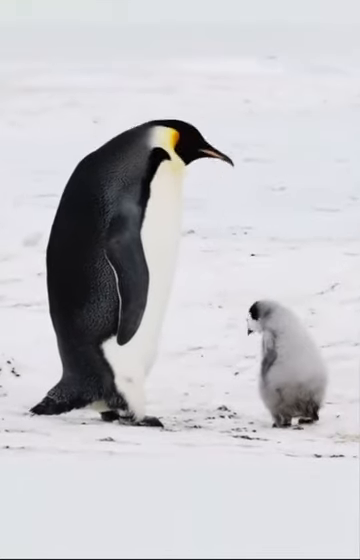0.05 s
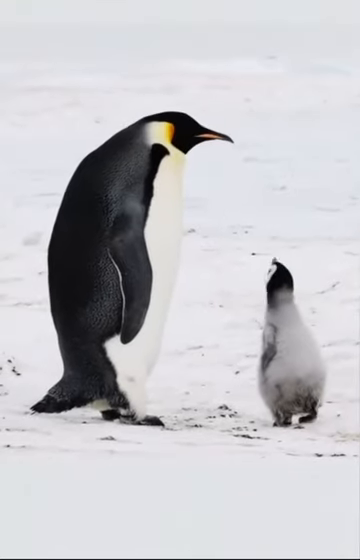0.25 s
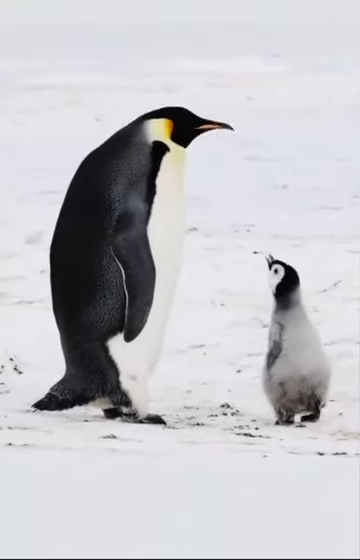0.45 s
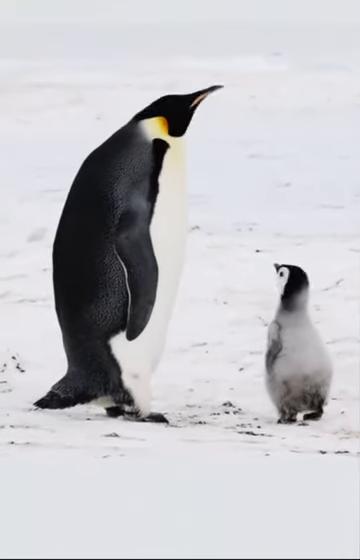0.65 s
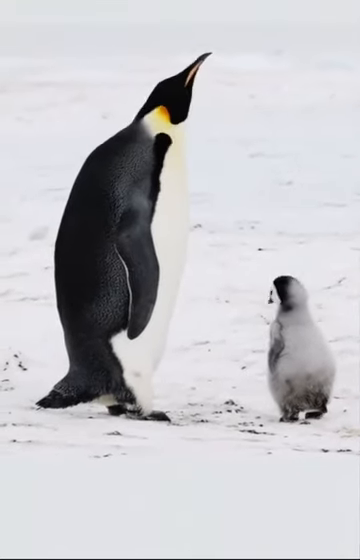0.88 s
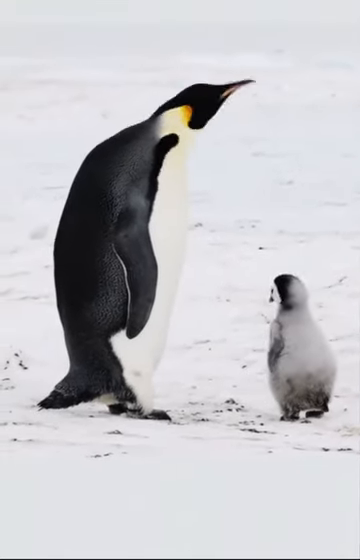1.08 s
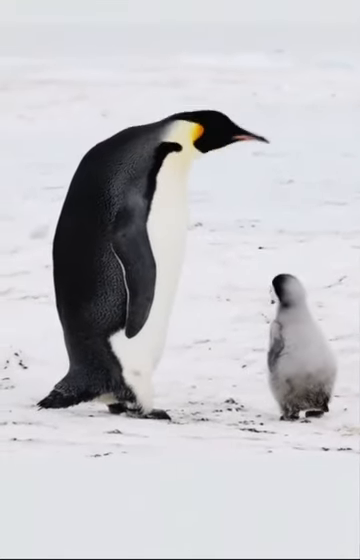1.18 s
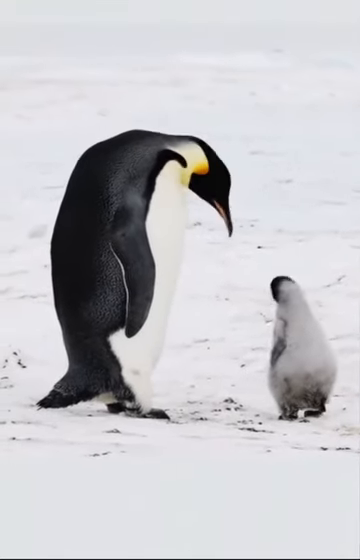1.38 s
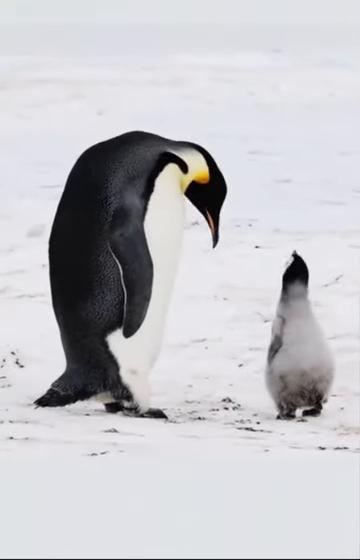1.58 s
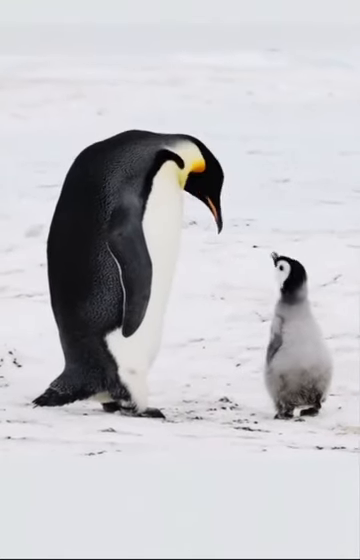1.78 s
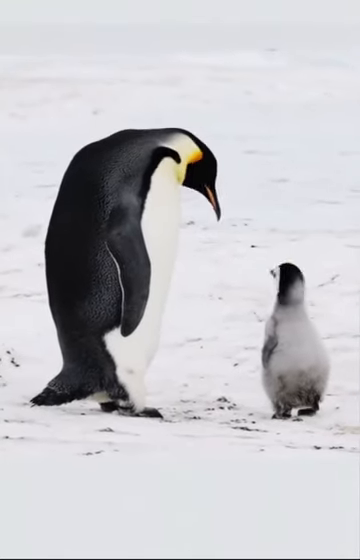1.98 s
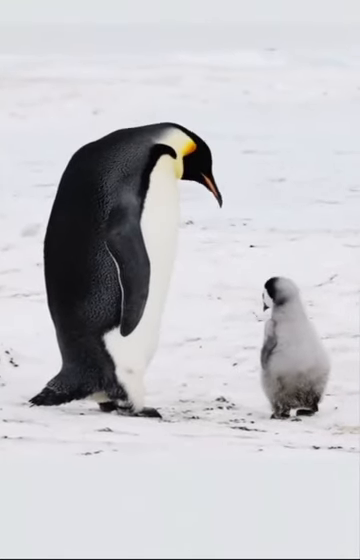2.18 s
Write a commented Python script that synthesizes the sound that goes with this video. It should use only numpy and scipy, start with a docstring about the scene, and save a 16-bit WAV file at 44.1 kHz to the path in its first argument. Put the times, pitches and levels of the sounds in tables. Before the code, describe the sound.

A penguin chick whistles two high begging phrases over soft wind.

```python
"""An emperor penguin chick begs twice on open snow: short whistles, then a long slurred one.
Each note is a near-sine with weak overtones shaped by the throat, thin and hoarse where it flicks high.
Behind it: a soft steady wind with low buffets, a few dull bumps, and a distant colony of
whistling chicks and braying adults."""
import sys
import numpy as np
from scipy import signal
from scipy.fft import rfft, irfft
from scipy.io import wavfile
from scipy.ndimage import uniform_filter1d

SR = 44100
rng = np.random.default_rng(int(sys.argv[2]) if len(sys.argv) > 2 else 0)


def inscribe(sig):
    """Save sig as 16-bit PCM at rate SR to the path in sys.argv[1].

    A 1-D sig is mono; a 2-D sig holds one channel per row.
    Samples are clipped to [-1, 1] before scaling.
    """
    pcm = np.round(np.clip(np.atleast_2d(sig).T, -1, 1) * 32767)
    wavfile.write(sys.argv[1], SR, pcm.astype(np.int16))


N = 99225

# Noise spectra: freq_hz, density_db
WIND_COLOUR = [(15, -40), (30, -21.5), (60, -16.5), (100, -9.5), (170, -8), (310, -11), (450, -4.5),
               (700, -8), (1100, -3), (1500, -0.5), (1900, -1.5), (2250, -15), (3000, -17), (4000, -18),
               (5000, -26), (6000, -30.5), (7200, -37.5), (13000, -40.5)]
BUFFET_COLOUR = [(20, -16), (50, -7), (90, 0.5), (170, 0.5), (300, -16), (1000, -52)]
BUMP_COLOUR = [(40, -18), (120, -9), (230, 10.5), (380, 1), (560, 3.5), (900, -9), (3000, -45.5)]
RASP_COLOUR = [(500, -32.5), (1500, -4.5), (2500, 1.5), (3800, -0.5), (4800, -7), (5900, 0.5),
               (7000, -14.5), (8300, -7.5), (10500, -21), (13000, -21.5)]
# Wind strength: time_s, level_db
WIND_LEVEL = [(0, -43.5), (.35, -44), (.8, -43), (1.35, -45.5), (1.85, -42), (2.05, -47), (2.25, -45)]
# Wind buffets and dull bumps: centre_s, level_db, half_length_s
BUFFETS = [(0.047, -56.5, 0.025), (0.712, -55.5, 0.063), (0.831, -53.5, .025), (2.163, -50.5, 0.017)]
BUMPS = [(1.018, -46.5, 0.013), (1.245, -44.5, 0.013), (1.468, -45.5, 0.023), (1.861, -51, 0.014)]
# Nearer chicks in the colony: centre_s, top_hz, level_db, length_s
COLONY_CALLS = [(.02, 1810, -51, .1), (.81, 2026, -53, .08), (.94, 2000, -48, .11), (.98, 2490, -55, .05),
                (1.05, 1982, -52, .09), (1.24, 1896, -46, .07), (1.33, 1940, -47, .08),
                (1.43, 1902, -51, .06), (2.19, 1760, -50, .09)]
# Voice colour of the adults; throat and beak of the chick: freq_hz, gain_db
ADULT_COLOUR = [(400, -3), (800, -1), (1300, -4.5), (1800, -3), (2300, -13), (3500, -16.5)]
THROAT_COLOUR = [(2500, -19.5), (3200, -23), (3750, -16.5), (4200, -26.5), (4600, -35), (5100, -30.5),
                 (5800, -15), (6300, -22), (7000, -36), (8300, -24.5), (10000, -33.5), (13000, -38.5)]
# Chick overtones ahead of the throat: harmonic, level_db
OVERTONES = [(2, 0.5), (3, -16.5), (4, -28), (5, -33.5)]
# Whistle contours: time_s, pitch_hz, level_db, overtone_db
OPENING_PEEP = [(0.124, 2080, -37.5, 12), (0.1295, 1810, -26.5, -8), (0.1459, 1893, -27, -3),
                (0.1519, 1930, -32, 6.5)]
FIRST_SHORT = [(0.191, 2879, -66.8, 3), (0.1947, 2765, -36.5, -11.5), (0.204, 1925, -20, 6),
               (0.219, 1795, -20, 8.5), (0.2316, 1968, -18, 4), (0.2386, 2610, -34.5, -6),
               (0.2449, 3090, -36.5, -0.5), (0.2547, 2830, -50, 11)]
FIRST_MIDDLE = [(0.309, 3363, -45, -9), (0.314, 3070, -32, -23.5), (0.323, 2187, -16.7, -14),
                (0.331, 1955, -12.7, 2), (0.3601, 1747, -14.5, -3), (0.38, 1652, -17.5, -9.5),
                (0.394, 1795, -14, 1.5), (0.4044, 1983, -12.8, -2), (0.41, 2596, -29.9, -4),
                (0.4174, 2907, -33.5, 9.5), (0.4333, 2180, -41.5, 20)]
FIRST_LONG = [(0.472, 3269, -47.5, 14), (0.477, 3231, -31, 2.5), (0.4875, 2160, -13.6, 2.5),
              (0.4956, 1928, -10, -6), (0.5084, 1790, -14, 0), (0.542, 1589, -19.5, -10.5),
              (0.5553, 1506, -24.5, 1.5), (0.5685, 1568, -20.5, -9), (0.6007, 1890, -11, -6),
              (0.6189, 2076, -11.5, 1.5), (0.6353, 2308, -18, -6), (0.6529, 2000, -12, 2),
              (0.6613, 1837, -11.9, -5), (0.6823, 1537, -20.5, 1.5), (0.6943, 1360, -32, 5.5),
              (0.74, 1076, -47, -2)]
SECOND_SHORT = [(1.486, 2690, -46, -2.5), (1.487, 2544, -37.5, -9.5), (1.494, 1841, -18, -8),
                (1.5033, 1715, -15, 1.5), (1.5168, 1864, -16, -8.5), (1.529, 2892, -40.5, -12.5),
                (1.5333, 2992, -37, -4), (1.5389, 2823, -47.5, 6)]
SECOND_MIDDLE = [(1.601, 2944, -49, 1), (1.6044, 3118, -33, -12), (1.613, 2252, -17, -8),
                 (1.619, 1954, -12.5, 2.5), (1.6335, 1787, -11.5, 0.5), (1.6669, 1556, -19.5, 2.5),
                 (1.6893, 1730, -12.5, 0), (1.7051, 2622, -35, 7.5), (1.7138, 3041, -27.5, -0.5),
                 (1.722, 3019, -33, 5), (1.7276, 2812, -37.5, 15)]
SECOND_LONG = [(1.755, 2676, -45.5, 23), (1.763, 3270, -26.5, -6), (1.7674, 2840, -20, 1),
               (1.7738, 2255, -29.0, 13.5), (1.7884, 1713, -16.5, 7), (1.8104, 1558, -16.4, 2),
               (1.8422, 1486, -19.5, -0.5), (1.8661, 1534, -17.1, 2), (1.8921, 1749, -13.5, -8),
               (1.9025, 1922, -16.5, 3.5), (1.9175, 2178, -25.5, 10.5), (1.9338, 1901, -16.5, 0.5),
               (1.943, 1623, -16.5, -2), (1.965, 1437, -20.5, 3), (2.0219, 1044, -53, -8)]
# Whistles in order: contour, rasp_db, flick_rasp_db, upper_overtone_db
NOTES = [(OPENING_PEEP, -27, -60, 0), (FIRST_SHORT, -37, -45.5, -2), (FIRST_MIDDLE, -43.5, -51, -7.5),
         (FIRST_LONG, -43, -46.5, -1), (SECOND_SHORT, -40, -57.5, -2.5), (SECOND_MIDDLE, -50, -49, -5.5),
         (SECOND_LONG, -40, -53, 0.88)]

ADULTS_PER_S, ADULT_HZ, ADULT_LENGTH_S, ADULT_GAIN_DB = 9, 429.3, .26, -58
CHORUS_PER_S, CHORUS_HZ, CHORUS_LENGTH_S, CHORUS_DB = 14, 1550, .08, -55
FAR_WAVER, FAR_ARCH, FAR_OVERTONE_DB = .01, .17, -16
JITTER, SHIMMER_DB, JITTER_RATE_HZ = .0015, .15, 395
HOARSE_ABOVE_HZ, HOARSE_FULL_HZ, HOARSE_JITTER, HOARSE_SHIMMER_DB = 2200, 2905, .012, 1
REEDY_BELOW_HZ, REEDY_DB = 1500, 8
SMEAR_RAD, SMEAR_RATE_HZ, FLUTTER_DB = .035, 692, .7
RASP_DB_PER_OCTAVE, RASP_REF_HZ, FLICK_REF_DB = 12, 1800, -31.5
SNOW_ECHO_DB, SNOW_T60_S, SNOW_DELAY_S = -28, .067, .015
LOWPASS_HZ = 13100


def undb(db):
    """Decibels to gain."""
    return 10 ** (np.asarray(db) / 20)


def colour(hz, curve):
    """Gain at hz of a freq_hz, gain_db curve."""
    freq_hz, gain_db = np.array(curve, float).T
    return undb(np.interp(np.log(np.maximum(hz, 1)), np.log(freq_hz), gain_db))


def noise(curve):
    """Coloured noise, rms 1."""
    x = irfft(rfft(rng.standard_normal(N)) * colour(np.fft.rfftfreq(N, 1 / SR), curve), N)
    return x / x.std()


def walk(rate_hz):
    """Smooth random drift, standard deviation 1."""
    width = max(int(SR / rate_hz), 1)
    x = uniform_filter1d(uniform_filter1d(rng.standard_normal(N), width), width)
    return x / x.std()


def swells(t, events):
    """Envelope of brief Gaussian swells."""
    return sum(undb(db) * np.exp(-((t - centre_s) / half_s) ** 2) for centre_s, db, half_s in events)


def wind(t):
    """Steady rush of air that swells slightly and eases at the end, plus soft low buffets."""
    rush = noise(WIND_COLOUR) * undb(np.interp(t, *np.array(WIND_LEVEL).T) + .35 * walk(rate_hz=3.9))
    return rush + noise(BUFFET_COLOUR) * swells(t, BUFFETS)


def bumps(t):
    """Dull bumps: short swells of low noise."""
    return noise(BUMP_COLOUR) * swells(t, BUMPS)


def far_adults(t):
    """Distant braying: overlapping nasal notes of eight harmonics, each sliding a little."""
    out = np.zeros(N)
    waver = 1 + FAR_WAVER * walk(rate_hz=60)
    draws = rng.standard_normal((int(ADULTS_PER_S * N / SR), 3))
    for i, (offset, detune, slide) in enumerate(draws):
        centre_s = (i + offset / 2) / ADULTS_PER_S
        position = (t - centre_s) / (ADULT_LENGTH_S / 2)
        on = np.abs(position) < 1
        hz = ADULT_HZ * np.exp(.1 * detune + .04 * slide * position[on]) * waver[on]
        phase = 2 * np.pi * np.cumsum(hz) / SR
        bray = sum(colour(k * hz, ADULT_COLOUR) * np.sin(k * phase + k * k * offset) for k in range(1, 9))
        out[on] += (1 - position[on] ** 2) * bray
    return undb(ADULT_GAIN_DB) * out


def far_whistle(t, waver, centre_s, top_hz, level_db, length_s):
    """Faint whistle, arching in pitch and level."""
    out = np.zeros(N)
    on = np.abs(t - centre_s) < length_s / 2
    edge = ((t[on] - centre_s) / (length_s / 2)) ** 2
    phase = 2 * np.pi * np.cumsum(top_hz * (1 - FAR_ARCH * edge) * waver[on]) / SR
    tone = np.sin(phase) + undb(FAR_OVERTONE_DB) * np.sin(2 * phase)
    out[on] = np.sqrt(2) * undb(level_db) * (1 - edge) * tone
    return out


def far_chicks(t):
    """Colony chicks: a few nearer calls above a random chorus."""
    waver = 1 + FAR_WAVER * walk(rate_hz=110)
    calls = list(COLONY_CALLS)
    draws = rng.standard_normal((int(CHORUS_PER_S * N / SR), 2))
    for i, (offset, detune) in enumerate(draws):
        centre_s = (i + offset / 2) / CHORUS_PER_S
        calls.append((centre_s, CHORUS_HZ * np.exp(.13 * detune), CHORUS_DB, CHORUS_LENGTH_S))
    return sum(far_whistle(t, waver, *call) for call in calls)


def snow_echo(t, voice):
    """Faint short scatter from the snow."""
    tail = rng.standard_normal(N) * undb(-60 * t / SNOW_T60_S) * (t > SNOW_DELAY_S)
    return undb(SNOW_ECHO_DB) * signal.fftconvolve(voice, tail / np.linalg.norm(tail))[:N]


def throat_overtones(hz, phase, upper_overtone_db):
    """Overtones shaped by throat and beak; the third and higher step up at low pitch."""
    upper_db = upper_overtone_db + REEDY_DB * (hz < REEDY_BELOW_HZ)
    smear_rad = SMEAR_RAD * walk(SMEAR_RATE_HZ)  # uneven cycles smear the higher overtones
    out = np.zeros(N)
    for k, level_db in OVERTONES:
        gain = undb(level_db + upper_db * (k > 2) + FLUTTER_DB * walk(rate_hz=130))
        out += gain * colour(k * hz, THROAT_COLOUR) * np.sin(k * phase + (k - 1) ** 2 * smear_rad)
    return out


def whistle(t, contour, rasp_db, flick_rasp_db, upper_overtone_db):
    """One note: a gliding tone with overtones and breath rasp, hoarse in the high flicks."""
    time_s, pitch_hz, level_db, overtone_db = np.array(contour, float).T
    hz = uniform_filter1d(np.interp(t, time_s, pitch_hz), size=260)
    bright_db = np.interp(t, time_s, overtone_db)
    hoarse = np.clip((hz - HOARSE_ABOVE_HZ) / (HOARSE_FULL_HZ - HOARSE_ABOVE_HZ), 0, 1)

    gate = uniform_filter1d(1. * ((t > time_s[0]) & (t < time_s[-1])), size=90)
    shimmer = undb((SHIMMER_DB + HOARSE_SHIMMER_DB * hoarse) * walk(JITTER_RATE_HZ))
    envelope = gate * uniform_filter1d(undb(np.interp(t, time_s, level_db)), size=130) * shimmer

    jitter = (JITTER + HOARSE_JITTER * hoarse) * walk(JITTER_RATE_HZ)
    phase = 2 * np.pi * np.cumsum(hz * (1 + jitter)) / SR
    overtones = undb(bright_db) * throat_overtones(hz, phase, upper_overtone_db)
    tone = np.sqrt(2) * (np.sin(phase) + overtones)

    strain_db = .6 * bright_db + RASP_DB_PER_OCTAVE * np.log2(hz / RASP_REF_HZ)
    rasp = envelope * undb(rasp_db + strain_db)
    flick_rasp = hoarse * undb(flick_rasp_db) * (np.abs(envelope) / undb(FLICK_REF_DB)) ** .45
    return envelope * tone + (rasp + flick_rasp) * noise(RASP_COLOUR)


def chick(t):
    """Two begging phrases over snow."""
    voice = sum(whistle(t, *note) for note in NOTES)
    return voice + snow_echo(t, voice)


def scene():
    """Close chick over wind, bumps and colony; mono."""
    t = np.arange(N) / SR
    return (wind(t) + bumps(t) + chick(t) + far_chicks(t) + far_adults(t))[None]


def record(dry):
    """Steep elliptic low-pass."""
    return signal.sosfilt(signal.ellip(10, .1, 80, LOWPASS_HZ, fs=SR, output="sos"), dry)


dry = scene()
out = record(dry)
inscribe(out)
```